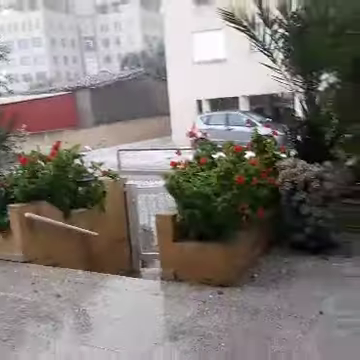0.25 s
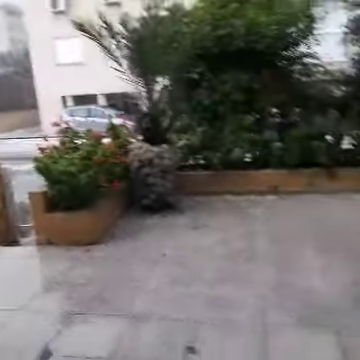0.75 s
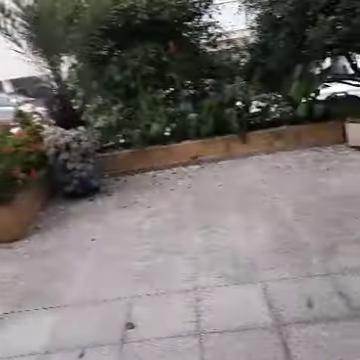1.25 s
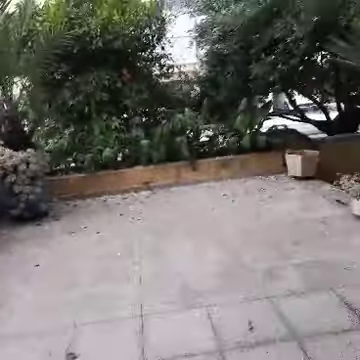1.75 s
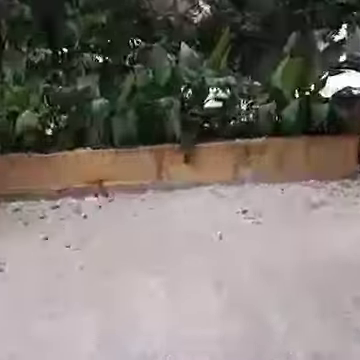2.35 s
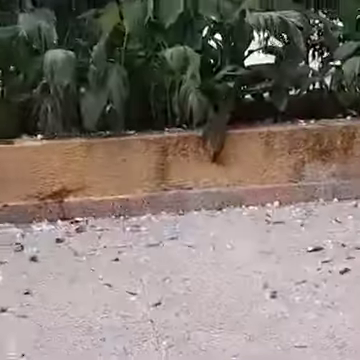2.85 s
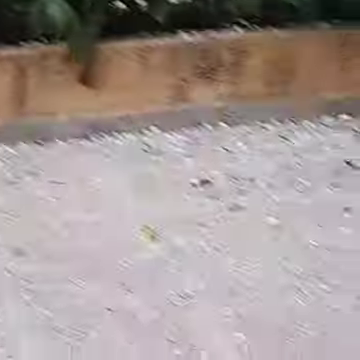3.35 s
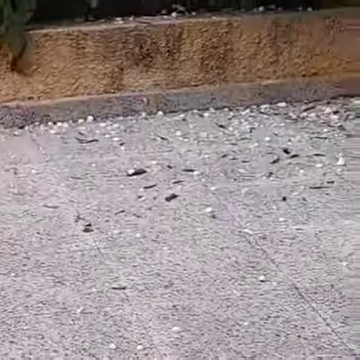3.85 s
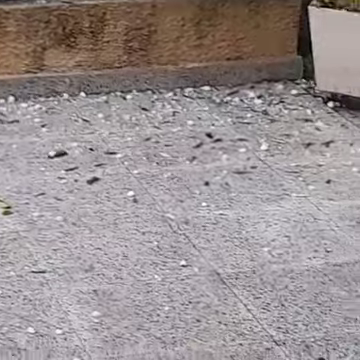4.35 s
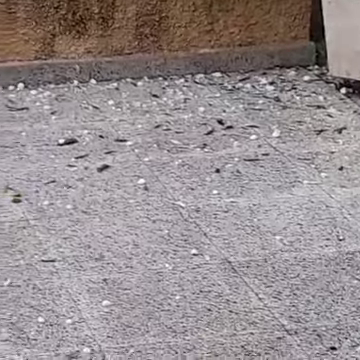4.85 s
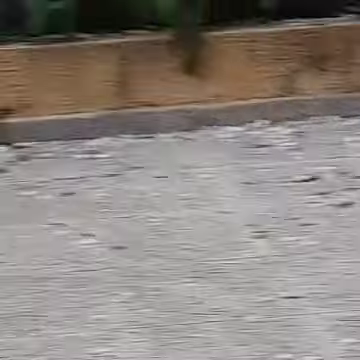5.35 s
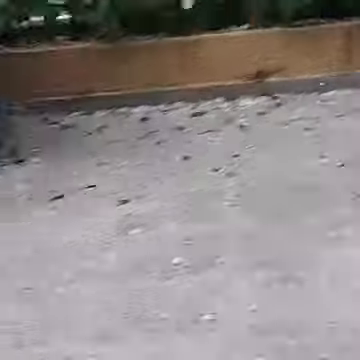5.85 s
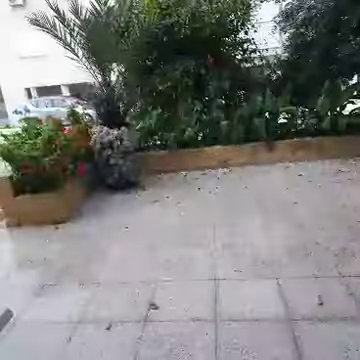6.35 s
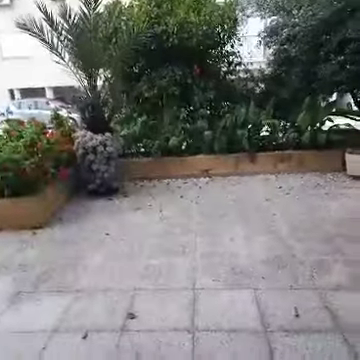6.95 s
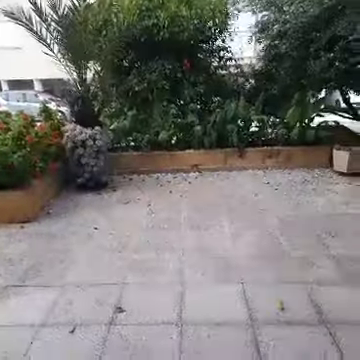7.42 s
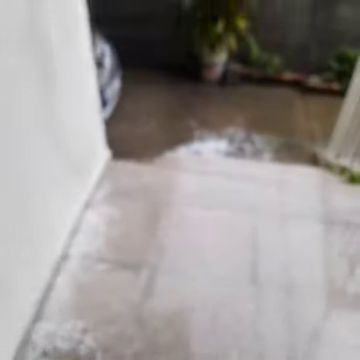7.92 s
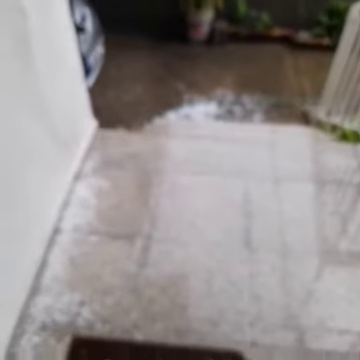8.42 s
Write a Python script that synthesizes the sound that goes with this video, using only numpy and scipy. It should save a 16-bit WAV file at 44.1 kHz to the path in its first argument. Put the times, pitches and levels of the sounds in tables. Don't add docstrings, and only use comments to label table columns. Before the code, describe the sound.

Steady hissing hailstorm over concrete, close stones snapping and ringing metal, a far engine revving up, a short silence, then dull hail from indoors.

```python
import sys
import numpy as np
from scipy import signal
from scipy.fft import rfft, irfft, next_fast_len
from scipy.io import wavfile
from scipy.ndimage import uniform_filter1d

SR = 44100
rng = np.random.default_rng(int(sys.argv[2]) if len(sys.argv) > 2 else 0)


def transcribe(u):
    v = np.clip(np.atleast_2d(u).T, -1, 1)
    q = np.round(v * 32767).astype(np.int16)
    wavfile.write(sys.argv[1], SR, q)


def convert_level_to_amplitude(level_db):
    exponent = np.asarray(level_db, float) / 20
    return 10 ** exponent


N = 382788

# [start t/s, end t/s]
PAUSE_S = (7.394, 7.562)
# [start t/s, end t/s]
TURN_S = (0.83, 1.67)
TURN_BACK_S = (5.89, 6.92)
TURN_BACK_SHARE = 0.57

# [t/s, f/Hz, level/dB rms]
ENGINE = [
    (4.7, 50, -57),
    (5.28, 59.8, -45),
    (5.96, 66.2, -40),
    (6.19, 70.3, -33.5),
    (6.57, 73, -29.5),
    (6.75, 76.4, -49),
]

LAYER_EDGES_HZ = (180, 500, 4000)
# [f/Hz, level/dB per Hz]
GATE_COLOUR = [(15, -46), (25, -27), (57, -4.5), (86, 1), (155, -3), (182, -13.5), (238, -7), (442, -12.5),
               (820, -10), (989, -16), (1740, -9), (7020, -23), (13000, -37.5), (15300, -33.5)]
HEDGE_COLOUR = [(15, -53.5), (25, -40), (50, -11.5), (75, -2.5), (147, -6.5), (265, -12.5), (312, -8),
                (430, -12), (1520, -12), (2210, -14.5), (6840, -23.5), (8480, -32.5), (12000, -28.5),
                (15300, -33.5)]
DOORWAY_COLOUR = [(15, -44), (25, -36.5), (54, 1), (86, -4.5), (119, 1), (220, -12.5), (288, -11),
                  (329, -12), (506, -23.5), (1600, -30), (3400, -38.5), (9190, -47.5), (15300, -47)]
# [f/Hz, width/Hz, level/dB]
GATE_MODES = [(870, 210, 4.5), (1080, 100, 1), (1260, 83, 5.5), (1790, 170, 1.5), (2484, 37, -1),
              (8500, 600, -5), (12300, 2600, 9.5)]
HEDGE_MODES = [(332, 150, -1), (1630, 310, 2.5), (2480, 35, 0), (7400, 580, 2.5), (8100, 340, -2)]
DOORWAY_MODES = [(115, 28, 2.1), (283, 13, 7.7), (2460, 80, 2)]
# [f/Hz, correlation/1]
YARD_LIKENESS = [(60, 0.87), (120, 1), (240, 0.89), (480, 0.44), (950, 0.53), (1890, 0), (3770, 0.03),
                 (7520, 0.24), (15000, -0.0)]
DOORWAY_LIKENESS = [(60, 0.85), (180, 1), (550, 0.63), (1650, 0.32), (4970, -0.14), (15000, -0.0)]
# [f/Hz, level/dB]
YARD_BALANCE = [(60, -1.8), (150, -0.78), (380, -1.4), (950, -1.7), (2380, -0.68), (5980, 0.69),
                (15000, 1.8)]
DOORWAY_BALANCE = [(60, 1), (150, 0), (380, -2.5), (950, 4), (2380, 0), (5980, 3.5), (15000, 5)]
# [t/s, hail level/dB, rumble level/dB]
YARD_SWELL = [(0, -0.5, 0), (0.28, 2.5, -4), (0.84, 2, 3.5), (1.4, 1.6, 0.2), (2.1, 1, 3), (2.52, 0.7, 0.5),
              (3.0, 0.2, 0.5), (3.4, 1.3, -1.5), (3.92, 0, -4), (4.4, 0.5, 0.3), (5.3, -1, -3.5),
              (5.65, -0.3, -1), (6.2, -1.7, 0), (6.9, -3, -3), (7.3, -2.7, 0)]
DOORWAY_SWELL = [
    (7.58, 0.2, -3),
    (7.9, 3, 0),
    (8.3, -3, -1),
    (8.48, 3, -1),
    (8.66, 1.5, 1.5),
]
# [mean level/dB, share of hail swell/1, share of rumble swell/1]
YARD_LAYERS = [
    (-33.5, 0.05, 0.86),
    (-34, 0.2, 0.31),
    (-28.5, 0.69, 0.017),
    (-33.5, 0.62, 0.017),
]
DOORWAY_LAYERS = [
    (-35, 0.05, 0.95),
    (-36.5, 0.99, 0.44),
    (-43, 0.78, 0.069),
    (-49.5, 0.05, 0.3),
]
# [t/s, level/dB, half length/s]
ROLLS = [(.1, 0, .05), (.3, 1, .05), (.58, 4, 0.054), (.82, 0.5, .06), (1.153, 3, .05), (1.5, 2.5, .05),
         (1.87, 6, .04), (2.1, 1, .04), (2.212, 7, 0.056), (2.427, 1, .04), (2.61, 6.5, .04),
         (2.72, 3, .04), (2.97, 5.5, .04), (3.07, 6.5, 0.032), (3.22, 2, .05), (3.55, 1, .06),
         (4.052, 4, .05), (4.45, 4, .05), (4.9, 0, .05), (5.25, 2, 0.059), (5.59, 3.5, 0.041),
         (5.83, 1, 0.034), (6.01, 1, .04), (7.042, 1, 0.041), (7.22, -1, .04), (7.673, 2, 0.037),
         (7.874, -1, .05), (8.16, 5, .04), (8.55, 1.5, .05)]

# [f/Hz, level/dB, t60/s]
RAIL_MODES = [
    (6760, -41.5, 0.18),
    (2460, -36, 0.26),
    (1465, -28.5, .12),
    (5440, -46, 0.11),
]
# [t/s, f/Hz, level/dB, t60/s, left minus right/dB]
PINGS = [(0.287, 6770, -46, 0.15, -1), (1.185, 5730, -36, 0.26, 14), (1.403, 11800, -25, 0.092, 8),
         (2.305, 2110, -20.5, 0.11, -2), (3.665, 6780, -38, 0.12, -4), (3.881, 8840, -45, 0.15, 2),
         (4.185, 3680, -30, 0.2, 6), (4.228, 1260, -33, 0.11, -9), (4.669, 6760, -30.5, 0.16, 8),
         (5.134, 2530, -24.5, 0.08, 13), (6.314, 1670, -25, 0.072, -7), (6.875, 6810, -35.5, 0.33, -9),
         (7.33, 2730, -28.5, 0.3, 0.5), (7.632, 1970, -42, 0.24, 6), (8.436, 2460, -39, 0.22, 2),
         (8.45, 3450, -46, 0.28, -1), (8.5, 2460, -46, 0.17, 9),
         (2.21, 7400, -43, .25, 1), (4.5, 2450, -32.5, .4, 0), (5.155, 2650, -27, 0.15, 0.5),
               (7.86, 2000, -40, .1, 0), (2.32, 2110, -27, 0.25, 1), (2.3, 5500, -30.5, .1, 6),
               (4.535, 1800, -27.5, 0.15, -2), (3.0205, 2500, -25, .015, 2), (3.026, 3000, -23.5, .018, 0),
               (7.865, 1100, -41, .2, -3), (8.455, 5000, -50, .2, 0), (7.12, 4050, -33, .15, 0),
               (7.16, 800, -29, .25, -3.5), (8.46, 1750, -44, .25, 0), (4.4, 1520, -31, .1, -3),
               (1.7, 2400, -34, 0.14, -1.5), (7.3, 840, -30, .3, -5)]
STREAKS = [
    (.67, 2450, -36, 0.46, 0),
    (.83, 2430, -33, .4, 2),
    (4.67, 2430, -32, 0.54, -2),
    (4.83, 2420, -36, 0.32, 0),
    (5.5, 2430, -36.5, .7, 3),
    (5.839, 1580, -31, .2, -7),
    (.3, 850, -36, .5, 0),
    (.45, 832, -35, .5, 3),
]

# [t/s, peak level/dB, dull part level/dB, bright part level/dB]
STONES = [(0.1835, -27, -1, -14), (0.5554, -22, 0, -14), (0.8604, -22.5, -2, -6.5),
          (1.3927, -24, -11, -7.5), (1.4794, -16, -8, -11), (1.9664, -18, -12, -29),
          (2.3012, -19.5, -3, -10.5), (2.5204, -24.5, 4, -21), (2.6594, -28, 2, -5.5),
          (2.7731, -21, -7, -14), (3.02, -15.5, -2.5, -13.5), (3.1014, -18.5, -11, -19),
          (3.4014, -22.5, 3, -15), (3.6284, -22, -11, -13), (3.7005, -25, 3, -10), (3.8107, -20, -1, -9),
          (3.8836, -17.5, 0.5, -10.5), (3.9514, -21.5, -1, -8), (4.4754, -24, 0, -13),
          (4.5286, -22.5, -1, -12), (4.7282, -16, -3.5, -14), (4.9392, -21, -10, -12),
          (4.9784, -29.5, -14, -0.5), (5.1517, -19.5, -3, -13), (5.7493, -24, 3, -15),
          (5.8306, -21.5, -2, -10), (5.9314, -19, 1, -9.5), (6.3006, -24, -13, -6), (6.4284, -22, 0, -8),
          (7.1008, -21.5, -13, -11)]
STONES_INSIDE = [(7.6271, -39.5, 4, -7), (7.7234, -40, -5, -3), (7.7434, -42, -8, -2),
                 (7.7624, -40, -10, -2), (7.8304, -39.5, 0, -7), (7.8574, -39, 7, -9),
                 (7.9574, -44, -3, -2.5), (8.0621, -45, 3, -9), (8.1224, -41, 4, -9), (8.2826, -40, 1, -5),
                 (8.3589, -42.5, -1, -2), (8.4078, -43, -5, -2), (8.4414, -38, 1, -6.5),
                 (8.5385, -43, -1, -11), (8.5694, -47, 5, 1)]
ECHO_T60_S, ECHO_GROWS_S_PER_DB = 0.21, 0.0061
SMALL_STONES_PER_S, SMALL_STONE_DB = 2.0, -30.5

# [t/s, body peak level/dB, bright peak level/dB, left minus right/dB]
CRACKS = [(0.8736, -24, -22, 0), (1.4039, -24, -20, 4), (1.9616, -24, -29, 7), (2.3008, -17, -32, 8),
          (2.9406, -23, -28, 10), (3.021, -14, -24, 4), (3.2234, -19, -35, -2), (3.3086, -26, -29, 5),
          (3.417, -21, -26, 6), (3.8121, -13, -18, -2), (3.8894, -22, -28, 11), (3.98, -23, -30, 10),
          (4.1854, -22, -29, 5), (4.7296, -20, -22, 1), (4.9797, -19, -28, 9), (5.9358, -21, -23, 4),
          (5.955, -18, -34, 1), (6.0621, -25, -27, -1), (6.3014, -18, -21, 3), (6.3157, -20, -26, 11),
          (6.4268, -24, -27, 0), (7.1057, -22, -36, 1), (7.2055, -26, -30, 5)]
CRACKS_INSIDE = [(7.6157, -44, -41, 15), (7.6282, -40, -43, 12), (7.646, -38, -45, 11),
                 (7.7273, -39, -40, 5), (7.745, -36, -39, 6), (7.7641, -31, -39, 4), (7.8379, -39, -43, 10),
                 (7.9306, -42, -42, 13), (7.9607, -36, -37, -4), (8.0912, -41, -43, 7),
                 (8.2262, -44, -42, 10), (8.2818, -38, -44, 9), (8.3454, -37, -39, 5),
                 (8.3615, -39, -32, 12), (8.5072, -39, -42, 8), (8.541, -38, -42, 4),
                 (8.5713, -38, -34, 10), (8.6188, -41, -44, 8)]
LESSER_CRACKS = [(0.0282, -30, -31, -8), (0.9401, -28, -29, 7), (2.1089, -22, -36, 0),
                 (2.7879, -25, -29, 2), (3.026, -21, -24, 1), (3.716, -27, -29, -3), (3.0232, -21, -25, 0),
                 (4.5335, -23, -32, 0), (5.7555, -23, -31, 0), (1.488, -21, -28, 2), (5.679, -23, -36, -3),
                 (5.8314, -25, -28, 3), (6.0663, -28, -31, 8), (6.304, -20, -34, 0)]
WALL_DETOUR_M = (2.6, 3.2)


def hear(x, pan_db):
    return x * convert_level_to_amplitude(np.array([[.5], [-.5]]) * pan_db)


def at_hz(points, hz):
    f, value = np.array(points)[:, 0], np.array(points)[:, 1]
    return np.interp(np.log(hz + 1), np.log(f), value)


def rms_one(x):
    return x / np.sqrt(np.mean(x ** 2) + 1e-20)


def drift(rate, count):
    r = np.exp(-80 * np.pi * rate / SR)
    coarse = rng.standard_normal(count // 40 + 2002)
    slow = signal.lfilter([1], [1, -2 * r, r * r], coarse)[2000:]
    return np.interp(np.arange(count) / 40, np.arange(len(slow)), rms_one(slow))


def band(x, low_hz, high_hz):
    sos = signal.butter(2, [low_hz, high_hz], "band", fs=SR, output="sos")
    return signal.sosfilt(sos, x + 1e-18)


def strikes(times, gains):
    train = np.zeros(N)
    at = np.round(np.asarray(times) * SR).astype(int)
    np.add.at(train, np.minimum(at, N - 1), gains)
    return train


def resonances(modes, hz):
    return sum(db / (1 + (2 * (hz - centre_hz) / width_hz) ** 2) for centre_hz, width_hz, db in modes)


def engine():
    s, hz, level_db = np.transpose(ENGINE)
    time = np.arange(N) / SR
    phase = np.cumsum(np.interp(time, s, hz)) * 2 * np.pi / SR
    gain = convert_level_to_amplitude(np.interp(time, s, level_db, left=-120, right=-120) + 1.5 * drift(6.5, N))
    return hear(np.sqrt(2) * gain * np.sin(phase), -1.56)


def layer_levels(rows, layers):
    s = np.arange(0, N / SR, .01)
    at, *controls = np.transpose(rows)
    hail_db, rumble_db = (np.interp(s, at, db) for db in controls)
    for peak_s, db, half_s in ROLLS:
        rumble_db = rumble_db + db * np.exp(-((s - peak_s) / half_s) ** 2)
    return np.transpose([s] + [db + hail * hail_db + rumble * rumble_db for db, hail, rumble in layers])


def downpour(span, rows, colour, modes, likeness, balance, lag_s, grain_db, patchy_db, gust_db):
    s, *levels = np.transpose(rows)
    start, stop = round(span[0] * SR), min(round(span[1] * SR), N)
    count = next_fast_len(stop - start)
    hz = np.arange(count // 2 + 1) * SR / count

    mid, side = rfft(rng.standard_normal((2, count)))
    alike = np.clip(at_hz(likeness, hz), -.98, .98)
    arrival = np.exp(-1j * np.pi * hz * lag_s * np.array([[-1], [1]]))
    far = np.sqrt(.5 + .5 * alike) * mid * arrival
    far = far + np.sqrt(.5 - .5 * alike) * side * arrival * [[1], [-1]]

    sizes = convert_level_to_amplitude(4.0 * np.minimum(rng.exponential(1, (2, count)), 5)) * rng.choice([-1, 1], (2, count))
    grains = rfft(rms_one(sizes * (rng.random((2, count)) < 500 / SR)))
    grain_share = convert_level_to_amplitude(grain_db) * hz ** 2 / (hz ** 2 + 3500 ** 2)
    tint = convert_level_to_amplitude(at_hz(colour, hz) + resonances(modes, hz))
    spectrum = hear((far + grain_share * grains) * tint, at_hz(balance, hz))

    gusts = gust_db * (drift(0.78, count) + 1.16 * drift(42.0, count))
    layers = np.zeros((len(levels), 2, count))
    for centre in np.arange(4.5, 14.5, .5):
        window = np.cos(np.pi * np.clip(np.log2(hz + 1) - centre, -.5, .5)) ** 2
        flicker_db = patchy_db * drift(5.7, count) + gusts * np.clip((centre - 8.3) / 5.9, 0, 1)
        layer = np.searchsorted(LAYER_EDGES_HZ, 2 ** centre)
        layers[layer] += convert_level_to_amplitude(flicker_db) * irfft(spectrum * window, count)
    rumble_power = np.mean(layers[0] ** 2, axis=0)
    layers[0] /= np.sqrt(uniform_filter1d(rumble_power, SR // 8, mode="wrap"))

    time = (start + np.arange(count)) / SR
    total = sum(convert_level_to_amplitude(np.interp(time, s, db)) * rms_one(x) for x, db in zip(layers, levels))
    out = np.zeros((2, N))
    out[:, start:stop] = total[:, :stop - start]
    return out


def plinks(per_s, scatter_db):
    scattered = [(hz, scatter_db - 3.4 * np.log2(hz / 1000), .07) for hz in np.geomspace(600, 7000, 14)]
    out, stop = np.zeros((2, N)), round(PAUSE_S[0] * SR)
    for hz, level_db, t60 in RAIL_MODES + scattered:
        draws = rng.random((round(per_s * 8), 3))
        touches = np.zeros((2, stop))
        at = (draws[:, 0] * stop).astype(int)
        touches[:, at] = hear(convert_level_to_amplitude(level_db - 7.7 * draws[:, 1]), 16 * (draws[:, 2] - .5))
        r, w = convert_level_to_amplitude(-60 / (t60 * SR)), 2 * np.pi * hz / SR
        resonator = [1, -2 * r * np.cos(w), r * r]
        out[:, :stop] += signal.lfilter([0, np.sin(w)], resonator, touches + 1e-18)
    return out


def pings():
    out = np.zeros((2, N))
    for rows, spread in ((PINGS, 1.1e5), (STREAKS, 3e4)):
        for s, hz, level_db, t60, pan_db in rows:
            t60 = t60 * min(1, (7000 / hz) ** 3)
            start = round(s * SR)
            t = np.arange(min(round(t60 * SR), N - start)) / SR
            places = np.linspace(-1.5, 1.5, 7)[:, None, None] + rng.normal(0, .2, (7, 2, 1))
            detune = places * spread / hz
            phase = rng.uniform(0, 2 * np.pi, (7, 2, 1))
            cluster = np.sum(np.sin(2 * np.pi * (hz + detune) * t + phase), axis=0) / np.sqrt(7)
            envelope = (1 - np.exp(-t / (0.04 * t60))) * convert_level_to_amplitude(level_db + 5.5 - 60 * t / t60)
            out[:, start:start + len(t)] += hear(cluster * envelope, pan_db)
    return out


def small_stones():
    draws = rng.random((round(SMALL_STONES_PER_S * PAUSE_S[0]), 4))
    return [(s * PAUSE_S[0], SMALL_STONE_DB + 4 * a, -6 * b, -14 + 6 * c) for s, a, b, c in draws]


def near_stones(rows, rise_s, echo_db):
    s, peak_db, dull_db, bright_db = np.transpose(rows)
    t60 = ECHO_T60_S + ECHO_GROWS_S_PER_DB * (np.median(bright_db) - bright_db)
    out, t = np.zeros((2, N)), np.arange(SR // 4) / SR
    parts = ((900, 3000, dull_db + 3.0, 1.1), (2680, 4620, 0 * s, 0.65),
             (5100, 7270, bright_db + 7.5, 1.0), (9200, 14400, bright_db + 5.0, 0.81))
    for low_hz, high_hz, part_db, lasts in parts:
        power = np.zeros(N + len(t))
        for k, at in enumerate(np.round(s * SR).astype(int)):
            decay_db = peak_db[k] + part_db[k] + echo_db - 60 * t / (lasts * t60[k])
            swell = (1 - np.exp(-t / rise_s)) * convert_level_to_amplitude(decay_db)
            power[at:at + len(t)] += swell ** 2
        sparse = rng.standard_normal((2, N)) * convert_level_to_amplitude(6.0 * rng.standard_normal((2, N)))
        out += np.sqrt(power[:N]) * rms_one(band(sparse, low_hz, high_hz))
    return out


def cracks():
    s, body_db, bright_db, pan_db = np.transpose(CRACKS + CRACKS_INSIDE + LESSER_CRACKS)
    wall_s = rng.uniform(*WALL_DETOUR_M, len(s)) / 343
    out = np.zeros((2, N))
    for low_hz, high_hz, peak_db in ((2000, 7300, body_db - .5), (9500, 15300, bright_db - .5)):
        for side, sign in enumerate((.5, -.5)):
            gain = -convert_level_to_amplitude(peak_db + 4.0 + sign * pan_db) * SR / (2 * (high_hz - low_hz))
            pulses = strikes(s - 1e-4, gain) + .55 * strikes(s + wall_s, gain)
            out[side] += band(pulses, low_hz, high_hz)
    return out


def scene():
    time = np.arange(N) / SR
    outside, inside = layer_levels(YARD_SWELL, YARD_LAYERS), layer_levels(DOORWAY_SWELL, DOORWAY_LAYERS)
    gate_view = (outside, GATE_COLOUR, GATE_MODES, YARD_LIKENESS, YARD_BALANCE)
    hedge_view = (outside, HEDGE_COLOUR, HEDGE_MODES, YARD_LIKENESS, YARD_BALANCE)
    door_view = (inside, DOORWAY_COLOUR, DOORWAY_MODES, DOORWAY_LIKENESS, DOORWAY_BALANCE)
    gate = downpour((0, 1.7), *gate_view, lag_s=0.000098, grain_db=-10, patchy_db=0.9, gust_db=1.0)
    gate += downpour((5.8, 7.45), *gate_view, lag_s=0.0001, grain_db=-7, patchy_db=0.8, gust_db=1.5)
    hedge = downpour((0.7, 7.45), *hedge_view, lag_s=1.1e-4, grain_db=-10.0, patchy_db=0.68, gust_db=1.0)
    doorway = downpour((7.5, 8.7), *door_view, lag_s=0.00036, grain_db=-8.5, patchy_db=0.3, gust_db=1.3)
    turned = np.pi / 2 * np.interp(time, TURN_S + TURN_BACK_S, [0, 1, 1, 1 - TURN_BACK_SHARE])
    far_hail = gate * np.cos(turned) + hedge * np.sin(turned) + doorway

    stones = near_stones(STONES + STONES_INSIDE + small_stones(), rise_s=0.0023, echo_db=-8.0)
    stones *= convert_level_to_amplitude(np.outer([1, -1], 1.2 * (time > PAUSE_S[1])))
    metal = plinks(per_s=4, scatter_db=-33.5) + pings()
    return engine() + far_hail + metal + stones + cracks()


def band_limit(x):
    return signal.sosfilt(signal.butter(12, 15840, fs=SR, output="sos"), x)


def record(dry):
    time = np.arange(N) / SR
    running = np.clip(np.maximum(PAUSE_S[0] - time, time - PAUSE_S[1]) / .0015, 0, 1)
    top_cut = signal.cheby2(14, 45, 15750, fs=SR, output="sos")
    mix = signal.sosfilt(top_cut, dry) * running
    return band_limit(mix)


dry = scene()
out = record(dry)
transcribe(out)
```